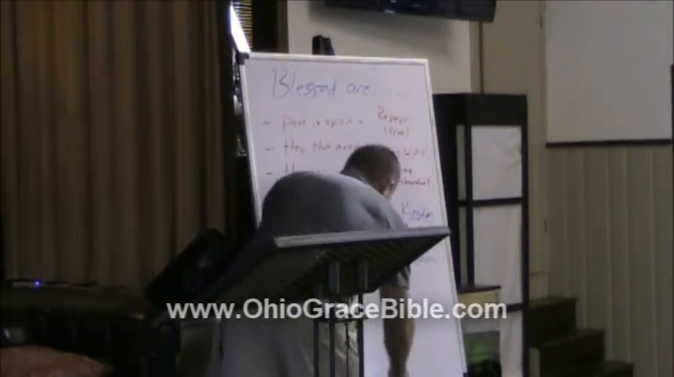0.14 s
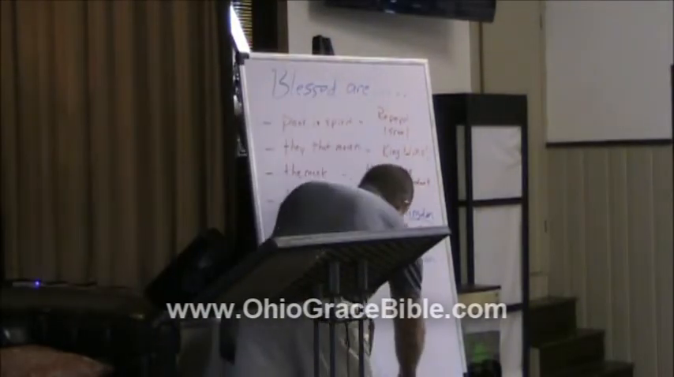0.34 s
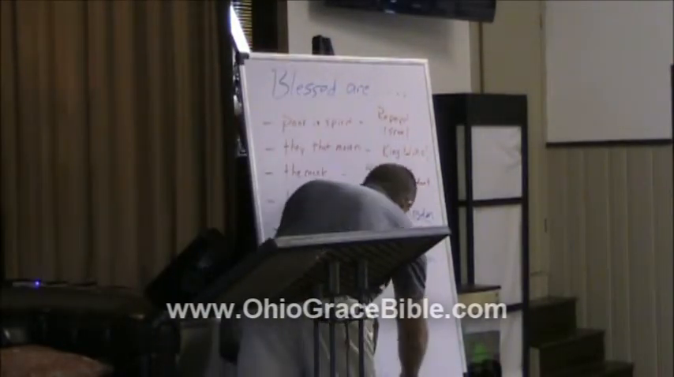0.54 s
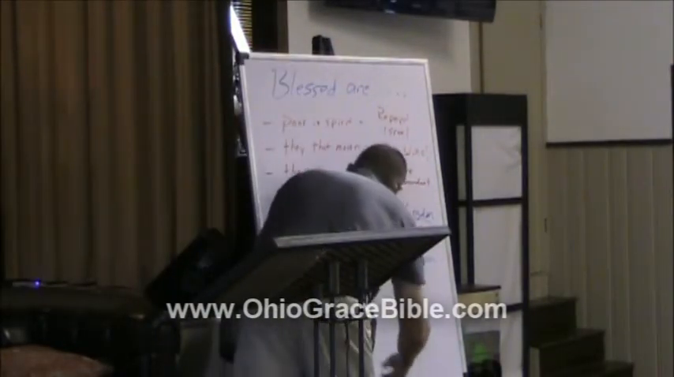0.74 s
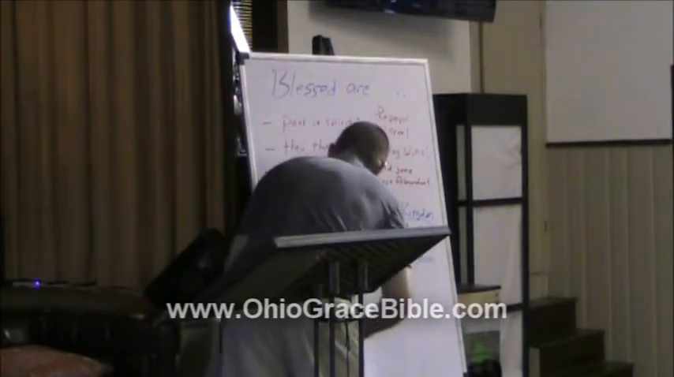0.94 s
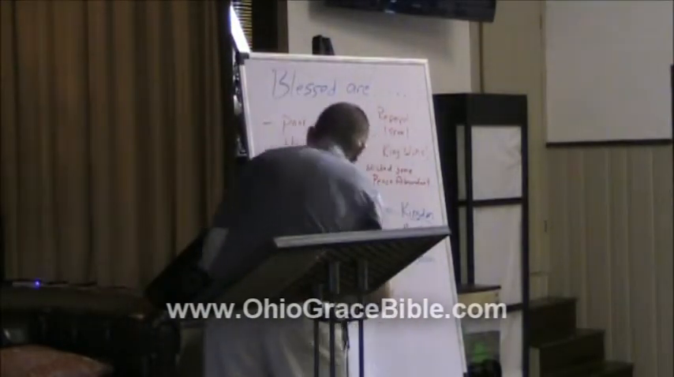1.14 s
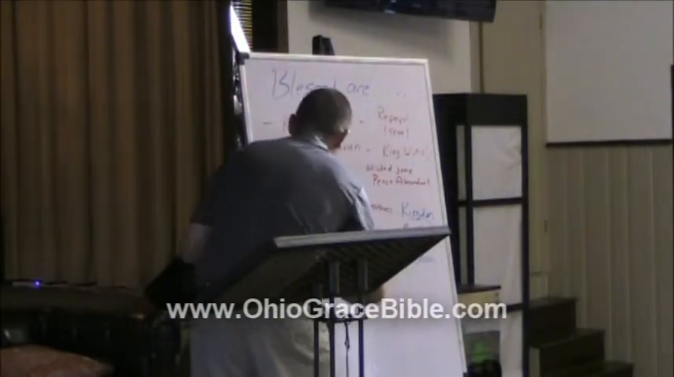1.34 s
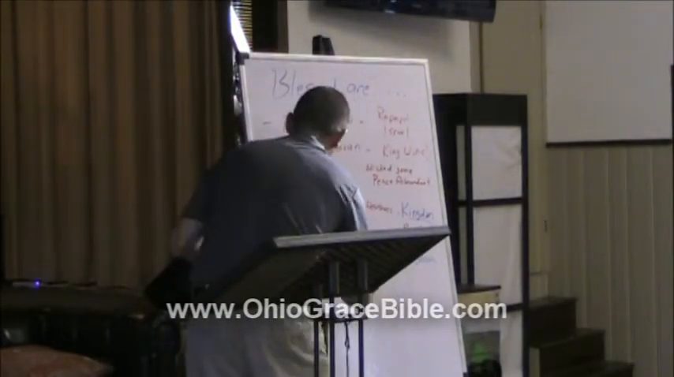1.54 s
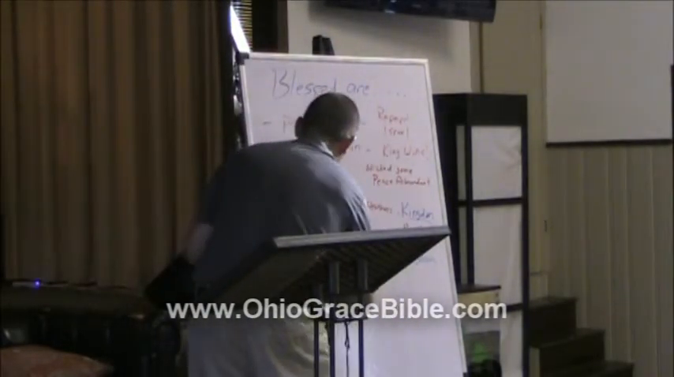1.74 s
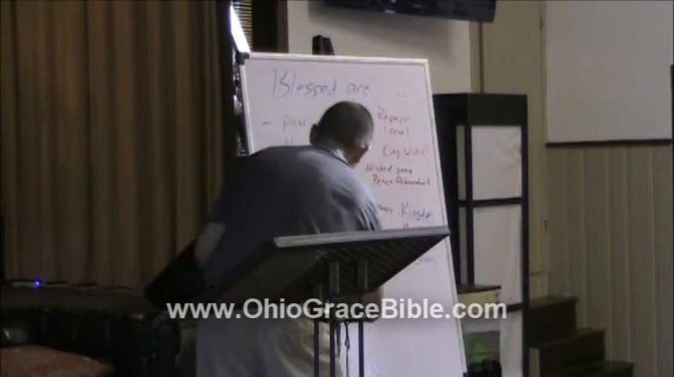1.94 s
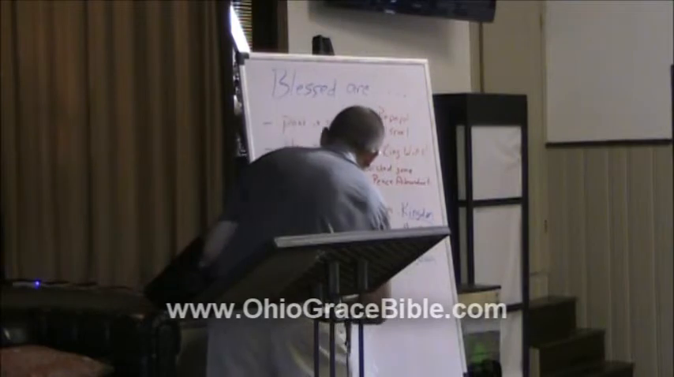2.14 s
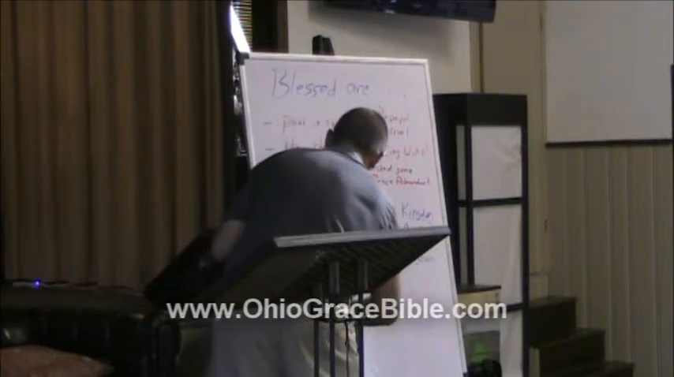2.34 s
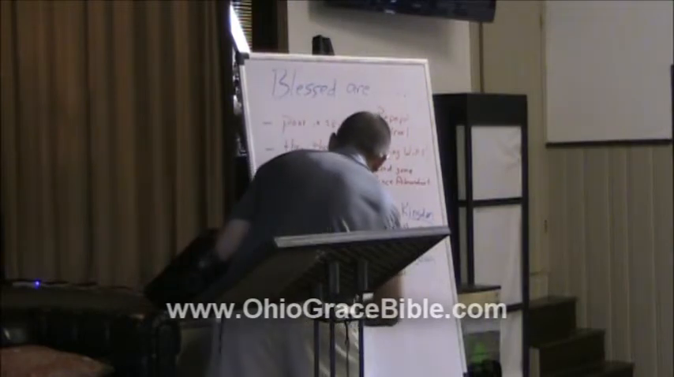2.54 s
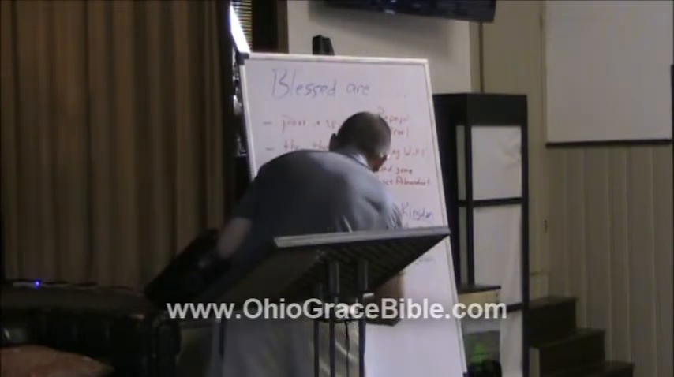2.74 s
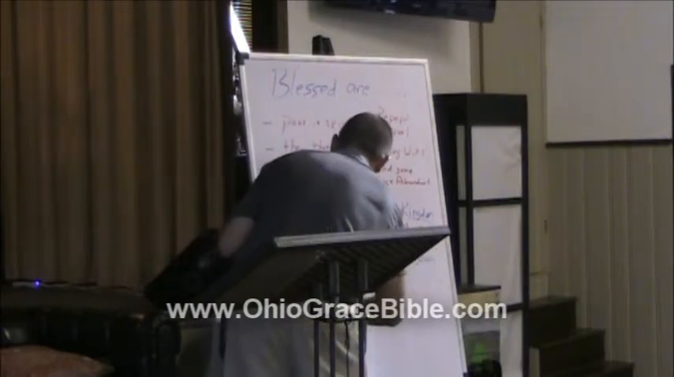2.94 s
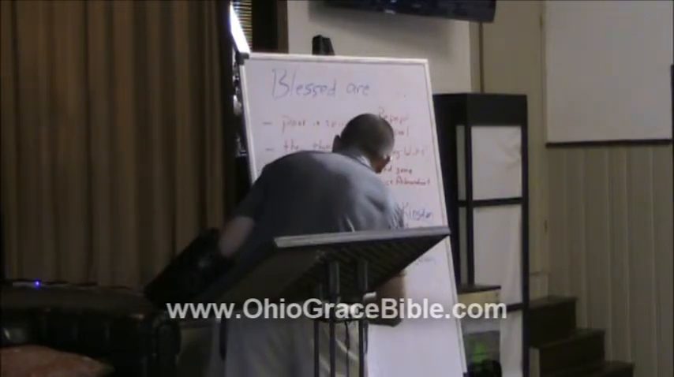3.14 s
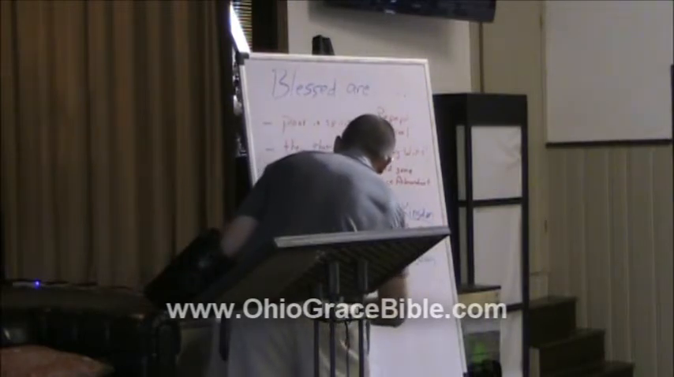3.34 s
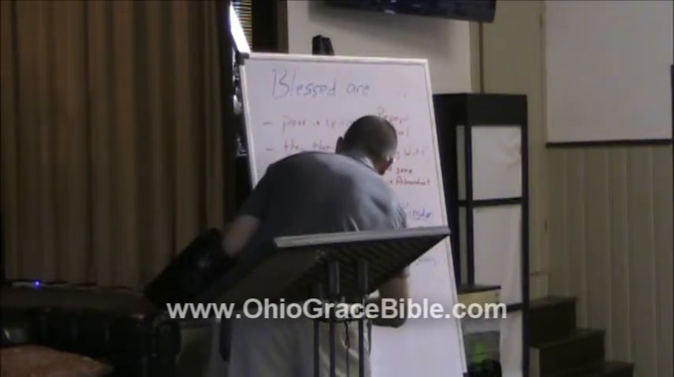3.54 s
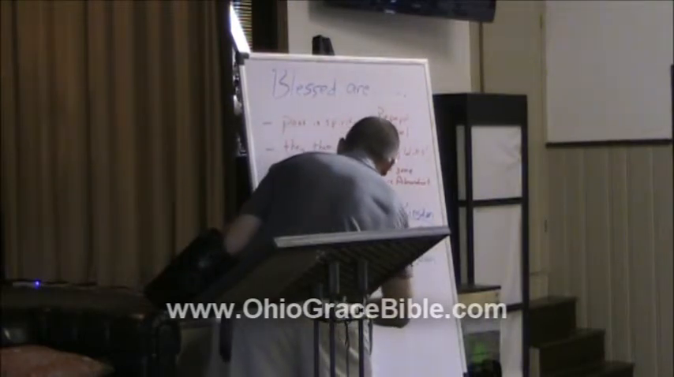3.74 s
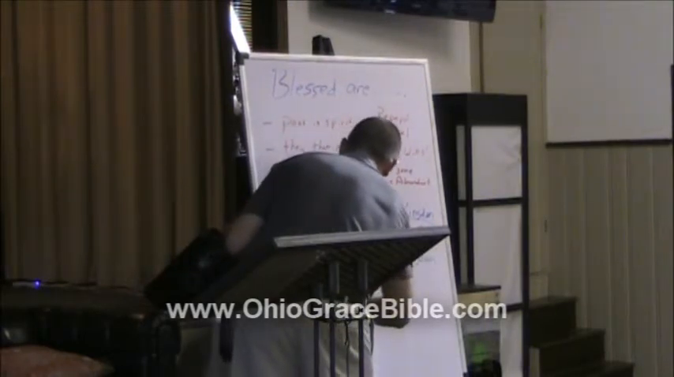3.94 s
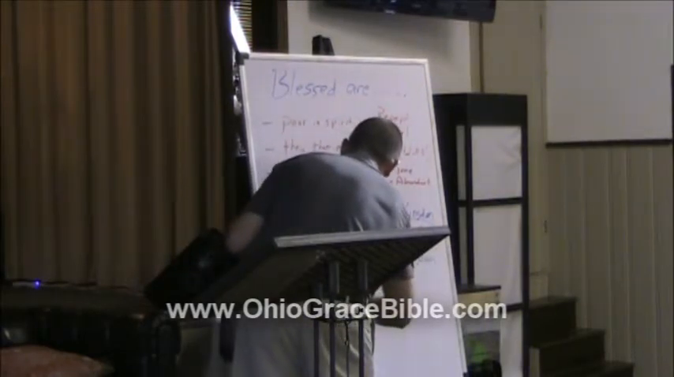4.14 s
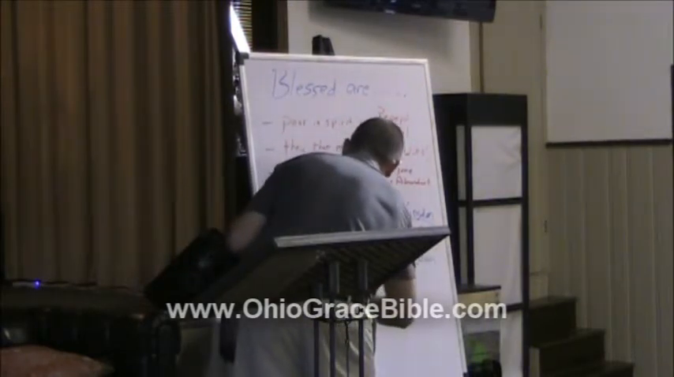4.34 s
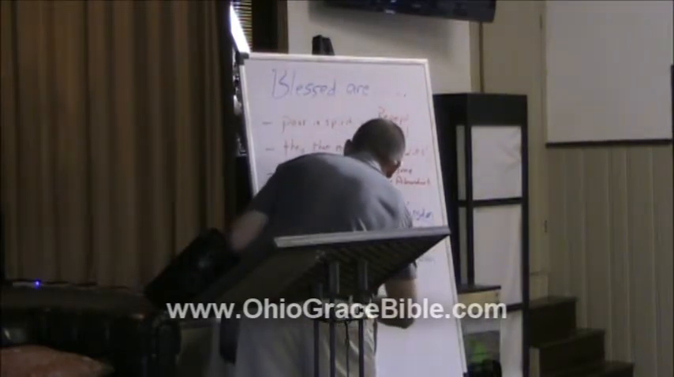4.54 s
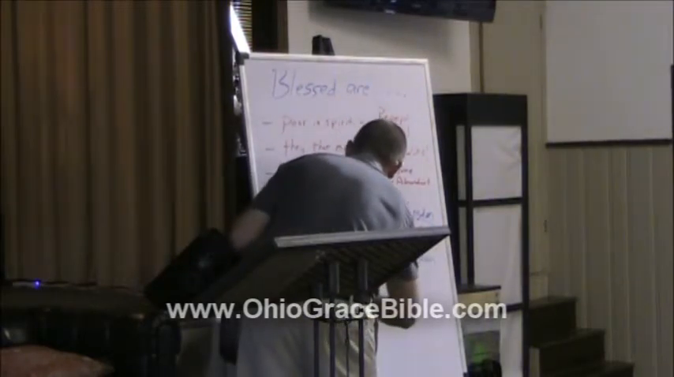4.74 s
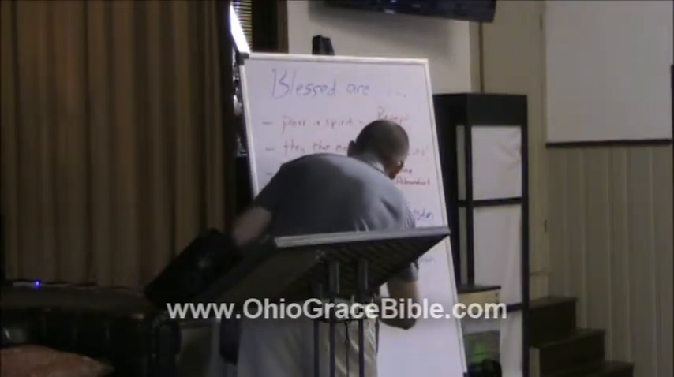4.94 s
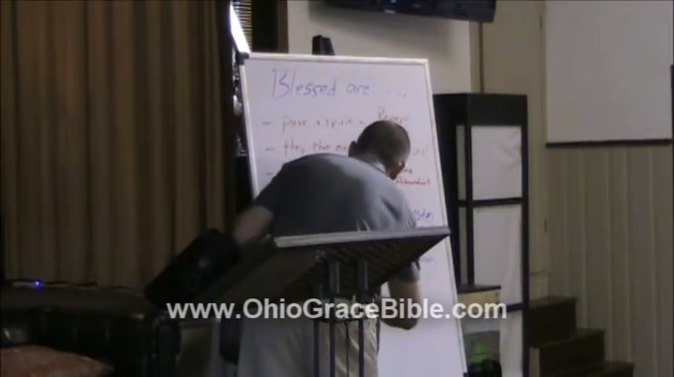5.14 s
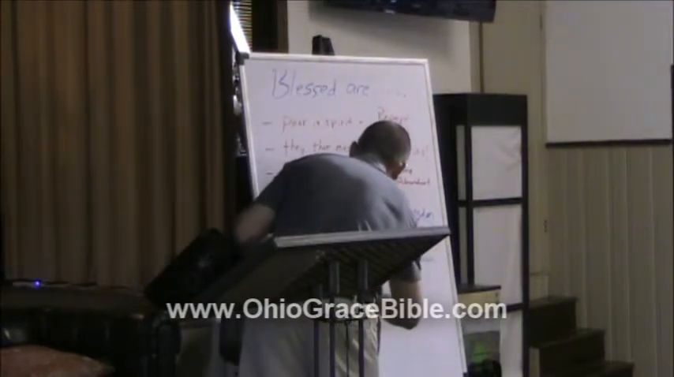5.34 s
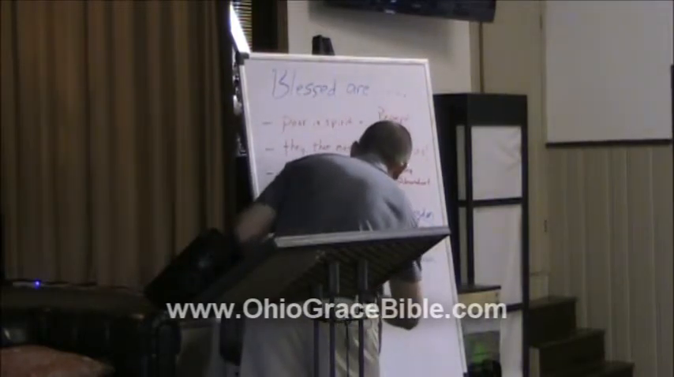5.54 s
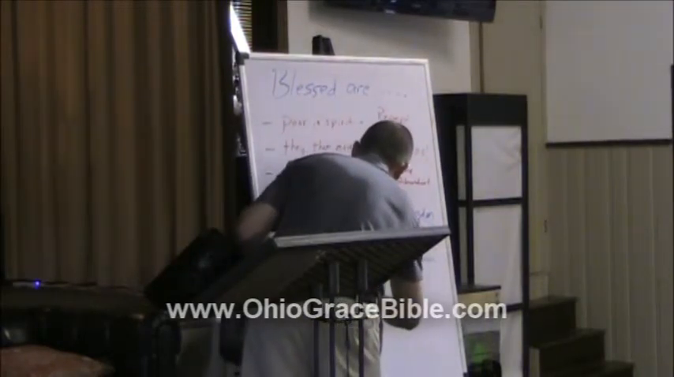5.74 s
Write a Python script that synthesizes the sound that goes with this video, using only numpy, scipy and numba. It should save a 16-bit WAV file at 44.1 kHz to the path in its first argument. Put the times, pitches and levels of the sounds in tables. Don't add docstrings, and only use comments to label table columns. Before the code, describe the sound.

A small indoor room with steady, low ventilation rumble, faint mains hum and thin hiss; the microphone is close to the board. At the very start there is a faint high squeak, the fading resonance of an earlier knock, and a soft cloth bump and rustle around 0.1-0.25 s. Hard woody clacks hit the tray at 0.2 and 0.35 s, then a dense clatter at 0.45-0.52 s with a low shudder and short room tail. Quiet follows, with a tiny click at 0.85 s. Fingers twist plastic: small bright ticks at 1.35 s, a loud dry cap pop at 1.41 s, and scraping until 1.65 s. Writing begins near 2.05 s with knocks at 2.07 and 2.3 s, and dull taps at 2.5 and 2.8 s. Soft felt hisses become lighter and more frequent after 3 s, with hollow thuds around 3.5, 4.1, 4.5, 5.0 and 5.4 s, and the strongest at 5.6 s.

```python
import sys
import numpy as np
from scipy import signal
from scipy.fft import rfft, irfft
from scipy.io import wavfile
from scipy.ndimage import uniform_filter1d
from numba import njit

SR = 44100
rng = np.random.default_rng(int(sys.argv[2]) if len(sys.argv) > 2 else 0)


def dump_mix(stems):
    frames = np.atleast_2d(stems).T
    limited = np.clip(frames, -1, 1)
    pcm = np.round(limited * 32767).astype(np.int16)
    wavfile.write(sys.argv[1], SR, pcm)


def natural_amplitude(level_db):
    exponent = np.asarray(level_db, float) / 20
    return 10 ** exponent


N = 259352
T = np.arange(N) / SR

# (frequency [Hz], density [dB])
AIR_SPECTRUM = [(12, -51), (20, -14), (60, -8), (260, -1), (759, -10.5), (1710, -15), (2320, -18.5),
                (16000, -21)]
# (frequency [Hz], width [Hz], level [dB])
DUCT = [(60, 23, 8), (124, 16, 4.5), (286, 36, 1), (630, 59, 3.5)]
# (frequency [Hz], level [dB])
HUM = [(59.5, -76), (119, -87), (15734, -84)]
# (frequency [Hz], density [dB])
HISS_SPECTRUM = [(12, -30), (20, 5), (70, -5), (347, -10), (949, -10), (1960, -12.5), (4940, -10),
                 (16000, -12.5)]
AIR_DB, HISS_DB = -55.5, -64

# (start [s], length [s], start pitch [Hz], middle pitch [Hz], end pitch [Hz])
SQUEAKS = [(.003, .05, 10150, 10650, 10300), (0., .052, 8700, 9050, 8600), (.015, .035, 8000, 8150, 7900),
           (.055, .045, 9500, 8900, 8800)]
SQUEAK_DB = -63

# (frequency [Hz], level [dB], T60 [s])
ROOM = [(165, -1.5, 0.58), (296, 2, 0.41), (546, 2, 0.52), (1150, -8, 1), (2200, -6, 0.22),
        (4000, -60, 0.082)]
# (time [s], level [dB])
EARLIER = (0., -33.5)
WALL_S, WALL_DB = .033, -20.5

# (fastest moment [s], length [s], level [dB], upper modes [dB])
REACH = [(.04, 0.25, -66, 1), (.122, .03, -55, -5), (.14, 0.022, -54, -5), (.159, .03, -48.5, -5),
         (.19, 0.094, -53.5, -4), (.242, 0.054, -62, 1), (.365, 0.13, -63, -1), (.535, 0.15, -60, -4)]
TWIST = [
    (1.225, .09, -72.5, 9),
    (1.515, 0.045, -59, -7),
    (1.558, 0.082, -58, -6),
    (1.606, 0.05, -51.5, -2.5),
    (1.658, .04, -63.5, -1),
]
FIRM = [(2.09, 0.07, -65.5, -6), (2.55, 0.061, -60.5, -8), (2.845, 0.12, -63, -8), (2.97, .04, -69, -7),
        (3.168, 0.077, -61.5, -6.5), (3.278, .07, -65.5, -6), (3.71, 0.054, -67.5, -5)]
LIGHT = [(2.93, 0.044, -66, -1), (3.12, 0.056, -63.5, -2), (3.33, 0.055, -71, 5), (3.395, .04, -64, -5),
         (3.5, .04, -67, -3), (3.625, .09, -66, 1), (3.96, 0.11, -71, 2), (4.032, 0.036, -65, 1),
         (4.22, 0.17, -67, .5), (4.33, .06, -76, 3), (4.42, 0.034, -64, 0), (4.5, .07, -65, -1),
         (4.61, 0.098, -66, 0), (4.69, 0.057, -68, 5), (4.76, .05, -63, 0.5), (4.845, 0.12, -68, 2),
         (5.06, .06, -68, -2), (5.17, .07, -65.5, 0), (5.23, .04, -73, 7), (5.45, 0.12, -68, 2.5),
         (5.61, 0.03, -66, 0), (5.67, .06, -70, 1), (5.77, 0.12, -76.5, 9), (5.84, .03, -70, -10)]
# (frequency [Hz], width [Hz], level [dB])
SLEEVE = ([(6100, 1500, -5.5), (7400, 2300, -6), (8350, 870, -9), (2240, 840, -9), (3300, 2000, -6.5),
           (7000, 9000, -2)], [(10960, 1600, -3.5), (13000, 13000, -1)])
PLUG = ([(5800, 1000, -1), (2500, 490, -6.5), (3150, 760, -5.5), (1660, 770, -8), (5000, 8500, -3)],
         [(11000, 1800, -2), (8600, 900, -8), (12000, 8000, -3)])
FELT = ([(6920, 1700, 2), (5570, 820, -2.5), (2820, 2400, -11)], [(10600, 3300, 4.5), (13000, 4000, 3)])
TIP = ([(5000, 3300, -2), (6300, 4400, -2), (2550, 1500, -4.5)], [(10700, 5200, 1), (8000, 2100, -8.5),
        (14400, 3000, -6)])
STROKES = [
    (REACH, SLEEVE, 0.67),
    (TWIST, PLUG, 0.51),
    (FIRM, FELT, 0.5),
    (LIGHT, TIP, 0.55),
]
STROKE_ENDS_DB = -9.5
STROKE_PEAKING = 1.5

# (time [s], level [dB], length [s])
BUMP = (.130, -40, .011)

# (time [s], level [dB], treble [dB], bass [dB], room [dB])
KNOCKS = [(0.215, -30.5, -11.5, -2, -2), (0.3473, -31, -9.5, 5.5, -2), (0.451, -46, -5, -11, -25),
          (0.4529, -28.5, -10, -4, -1.5), (0.4766, -30, -9, 2, -15), (0.4791, -32.5, -0.5, -19, -15),
          (0.4887, -29, -1.5, 6, -14), (0.507, -51, 14, -20, -23), (0.5113, -31, 7, -2, -20),
          (.519, -46, -12, 23.5, 0), (2.07, -37, -10.5, -13, 1.5), (2.2966, -38, -9, -33, 3.5)]
# (frequency [Hz], level [dB], T60 [s])
TRAY = [(337, -3, 0.055), (522, 0.5, 0.042), (820, 2, 0.028), (1390, -14.5, 0.011), (2110, -2, 0.041),
        (3060, -17, 0.0052)]
CRACK = [(1950, 0.5, 0.0084), (3240, 0.5, 0.0075), (6260, 0.5, 0.0056), (8600, 0, 0.0034),
         (13100, -3.5, 0.0055)]
TRAY_BASS = [(128, -20, 0.086), (175.8, -1, 0.49), (281, 16.5, 0.1), (360, 9, 0.19)]
RATTLE_S = .002

# (frequency [Hz], level [dB], T60 [s])
KNUCKLE = [(867, -2, .028), (970, -24, .028)]
COLLAR = [(8670, 0, 0.0037), (3750, -13.5, .0047)]
CAP = [(202, -12, 0.0069), (554, -11, 0.0088), (1210, -6.5, 0.0062), (2380, -1.5, .006), (3780, -2, .003),
       (4500, -16, 0.0035)]
RIM = [(6250, -6, .005), (7500, 1.5, .0035), (8400, 2, 0.0047), (9240, -1, 0.0052), (10500, -7, 0.0065),
       (14100, -8, 0.0056)]
BARREL = [(2280, 0, 0.014), (3020, -6, .018)]
NIB = [(1280, 3, .005), (2200, -4, .005)]
LEDGE = [(644, -4, 0.055)]
LEG = [(300, 0, 0.04), (265, -2.5, 0.065)]
THUMP = [(173, -1.5, 0.33), (215, 4, 0.085), (48, -8, 0.38)]
RAIL = [(332, 0.5, 0.11), (683, -10, 0.044), (815, 1, 0.055), (983, 0, 0.05), (1245, -1, 0.034),
        (2040, -4, .03), (2280, -7, .05)]
# (time [s], level [dB], part)
SNAPS = [(.4775, -32.5, LEG), (.5125, -28.5, LEDGE), (0.5227, -33.5, THUMP), (.8435, -42.5, KNUCKLE),
         (1.3425, -25, COLLAR), (1.3508, -30.5, COLLAR), (1.4127, -15, CAP), (1.413, -18.5, RIM),
         (1.4174, -36.5, BARREL), (2.07, -32, RAIL), (2.2969, -30.5, RAIL), (3.496, -46.5, NIB),
         (4.496, -45.5, NIB), (5.043, -46.5, NIB), (5.429, -47, NIB)]
SNAP_RISE_S = 0.00024

# (crest time [s], level [dB], thud pitch [Hz], rebound [dB], panel ring [dB])
TAPS = [(2.0446, -35, 303, 1.5, -26), (2.5273, -26.5, 296, 3, -14), (2.779, -34, 240, 4.5, -30),
        (3.4666, -32, 266, -24, -16), (3.886, -41.5, 253, -20, -34), (4.128, -36, 209, -32, -31),
        (4.4678, -32, 219, -33, -13), (5.0083, -28.5, 250, -40, -7), (5.3976, -28, 265, -28, -6),
        (5.6, -21, 534, -5, -11)]
# (frequency [Hz], level [dB], T60 [s])
PANEL_MODES = [(461, 4, 0.046), (632, -8.5, 0.056), (124, 7.5, 0.021)]
EDGE_S, EDGE_GAIN, EDGE_FADE = .0038, 0.31, 0.83
TAP_ROOM_DB, TAP_ROOM_SLOPE = -41.5, 0.42

LOW_CUT_HZ, TOP_HZ = 45, 15800


def level(x, db):
    return x * natural_amplitude(db) / np.sqrt(np.mean(x ** 2))


@njit
def svf(x, hz, width):
    y, b, l = np.empty(len(x)), 0., 0.
    for i in range(len(x)):
        g, k = np.tan(np.pi * hz[i] / SR), width / hz[i]
        v = (b + g * (x[i] - l)) / (1 + g * (g + k))
        b, l, y[i] = 2 * v - b, l + 2 * g * v, k * v
    return y


def band(x, hz, width):
    return svf(x, np.clip(hz + np.zeros(len(x)), 10, .45 * SR), 1. * width)


def decay(t, t60):
    return np.exp(-np.log(1000) * t / t60)


def ring(hz, t60, t):
    return np.sin(2 * np.pi * hz * t) * decay(t, t60)


def add(track, s, sound, db):
    i = int(s * SR)
    part = sound[:N - i]
    track[i:i + len(part)] += part * natural_amplitude(db) / np.abs(sound).max()


def walk(rate):
    k = max(int(SR / rate), 1)
    held = np.repeat(rng.standard_normal(N // k + 1), k)
    return 0.55 * uniform_filter1d(uniform_filter1d(held, k), k)[:N]


def coloured(points, peaks=()):
    hz, db = np.transpose(points)
    f = np.maximum(np.arange(N // 2 + 1) * SR / N, 1)
    db = np.interp(np.log(f), np.log(hz), db)
    for centre, width, gain in peaks:
        db = db + gain * np.exp(-((f - centre) / width) ** 2)
    return irfft(rfft(rng.standard_normal(N)) * natural_amplitude(db), N)


def burst(bands, rattle_s, t):
    out = 0
    for hz, db, t60 in bands:
        shake = rng.standard_normal(len(t)) * decay(np.maximum(t - rattle_s, 0), t60)
        shake[0] = 1.06 * np.sqrt(SR / hz)
        out = out + level(band(band(shake, hz, hz), hz, hz), db) * np.sqrt(t60)
    return out


def ventilation():
    return level(coloured(AIR_SPECTRUM, DUCT), AIR_DB) * natural_amplitude(.4 * walk(3))


def mains_hum():
    out = np.zeros(N)
    for hz, db in HUM:
        out += natural_amplitude(db) * np.sin(2 * np.pi * hz * T + .5 * walk(4.12)) * natural_amplitude(2.0 * walk(4.0))
    return out


def amplifier_hiss():
    return level(coloured(HISS_SPECTRUM), HISS_DB) * np.array([[1], [-1]])


def squeaks():
    out = np.zeros(N)
    for s, length, hz_a, hz_mid, hz_b in SQUEAKS:
        u = np.clip((T - s) / length, 0, 1)
        arch = 4 * u * (1 - u) * (hz_mid - (hz_a + hz_b) / 2)
        hz = hz_a + (hz_b - hz_a) * u + arch
        swell = np.sin(np.pi * u).clip(0) ** .3
        out += natural_amplitude(SQUEAK_DB) * swell * np.sin(2 * np.pi * np.cumsum(hz) / SR)
    return out


def room(far):
    t = T[:SR // 2]
    tail = np.zeros(len(t))
    for hz, db, t60 in ROOM:
        tail += natural_amplitude(db) * level(band(rng.standard_normal(len(t)), hz, 0.87 * hz), 0) * decay(t, t60)
    tail *= 1 - np.exp(-t / .004)
    return signal.fftconvolve(far, tail * natural_amplitude(-35.5))[:N]


def rubbed_modes(grain, modes):
    out = np.zeros(len(grain))
    for hz, width, db in modes:
        noise = grain * rng.standard_normal(len(grain))
        out += level(band(band(noise, hz, width), hz, width), db)
    return out


def rub():
    out = np.zeros(N)
    grain = natural_amplitude(3.0 * walk(120) + 5.0 * walk(400))
    for movements, (body_modes, upper_modes), rise in STROKES:
        for s, length, db, upper_db in movements:
            span = slice(max(int((s - .15) * SR), 0), int((s + .15) * SR))
            late = T[span] - s
            body = rubbed_modes(grain[span], body_modes)
            upper = rubbed_modes(grain[span], upper_modes)
            u = np.abs(late) / (length * np.where(late < 0, rise, 1 - rise))
            speed = natural_amplitude(db + STROKE_ENDS_DB * u ** STROKE_PEAKING)
            out[span] += speed * (body + natural_amplitude(upper_db) * upper)
    return out


def cloth_bump(near):
    s, db, length = BUMP
    u = (T[:SR // 5] - .02) / length
    add(near, s - .02, (1 - 6 * u ** 2) * np.exp(-3 * u ** 2), db)


def knocks(near, far):
    t = T[:SR // 4]
    shudder = sum(natural_amplitude(g) * ring(hz, t60, t) for hz, g, t60 in TRAY_BASS) * np.minimum(t / 0.0009, 1)
    blow = np.exp(-t / .00006) - 0.018 * np.exp(-t / 0.00093)
    add(far, EARLIER[0], blow, EARLIER[1])
    for s, db, treble_db, bass_db, room_db in KNOCKS:
        add(near, s, burst(TRAY, RATTLE_S, t), db + 4.5)
        add(near, s, burst(CRACK, RATTLE_S, t), db + treble_db + 8)
        add(near, s + 0.0046, shudder, db + bass_db - 12.5)
        add(near, s + WALL_S, burst(TRAY[2:], 2 * RATTLE_S, t), db + room_db + WALL_DB)
        add(far, s, blow, db + room_db + 10.5)
        add(far, s, ring(310, 0.0065, t), db + bass_db - 24.5)


def clicks(near, far):
    t = T[:SR // 5]
    for s, db, part in SNAPS:
        snap = .05 * rng.standard_normal(len(t)) * np.exp(-t / 0.00062)
        snap[0] = -1
        modes = np.zeros(len(t))
        for k, (hz, g, t60) in enumerate(part):
            modes += (-1) ** k * natural_amplitude(g) * ring(hz, t60, t)
        sound = signal.fftconvolve(snap, modes)[:len(t)]
        strongest_hz = max(part, key=lambda mode: mode[1])[0]
        scrape = band(rng.standard_normal(len(t)), strongest_hz, 2 * strongest_hz) * np.exp(-t / 0.0018)
        sound = sound / np.abs(sound).max() + 0.2 * scrape
        sound = sound * (1 - np.exp(-t / SNAP_RISE_S))
        add(near, s, sound, db)
        add(far, s, sound, db - 27.5)


def thud(t, hz, rebound_db):
    u = t * hz
    swing = np.where(u > .25, 2.6 * natural_amplitude(rebound_db), np.where(u < -.25, 1.3, 1))
    return np.cos(2 * np.pi * u) * np.exp(-np.where(u < 0, 1.8, 4.5) * u ** 2) * swing


def taps(near, far):
    t = T[:SR // 8] - .008
    for s, db, hz, rebound_db, ring_db in TAPS:
        push = thud(t, hz, rebound_db)
        sound = push.copy()
        for k in range(8):
            echo = thud(t - (k + 1) * EDGE_S, min(hz, 290), rebound_db)
            sound += EDGE_GAIN * (-EDGE_FADE) ** k * echo
        modes = sum(natural_amplitude(g) * ring(f, t60, np.maximum(t + 0.28 / f, 0)) for f, g, t60 in PANEL_MODES)
        add(near, s + t[0], sound + natural_amplitude(ring_db) * modes, db)
        add(far, s + t[0], push, TAP_ROOM_DB + TAP_ROOM_SLOPE * db)


def scene():
    near, far = np.zeros((2, N))
    cloth_bump(near)
    for add_to in (knocks, clicks, taps):
        add_to(near, far)
    mono = squeaks() + room(far) + rub() + near
    low_cut = signal.butter(2, LOW_CUT_HZ, "high", fs=SR, output="sos")
    mono = signal.sosfilt(low_cut, mono) + ventilation() + mains_hum()
    return np.array([mono, mono])


def low_pass(x):
    return signal.sosfilt(signal.butter(12, 17000, fs=SR, output="sos"), x)


def record(dry):
    wired = dry + amplifier_hiss()
    top_cut = signal.ellip(8, .1, 40, TOP_HZ, fs=SR, output="sos")
    wired = signal.sosfiltfilt(top_cut, wired)
    return low_pass(wired)


dry = scene()
out = record(dry)
dump_mix(out)
```